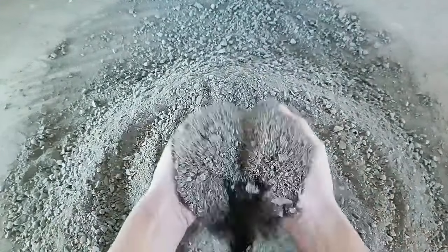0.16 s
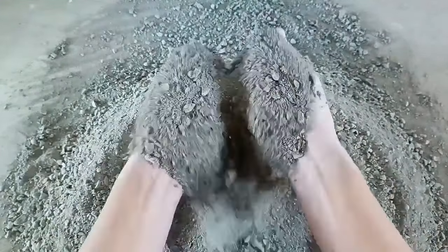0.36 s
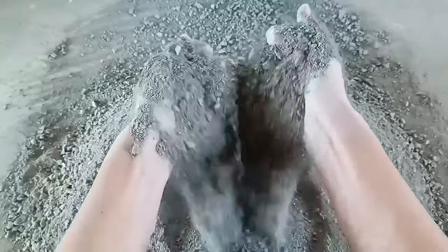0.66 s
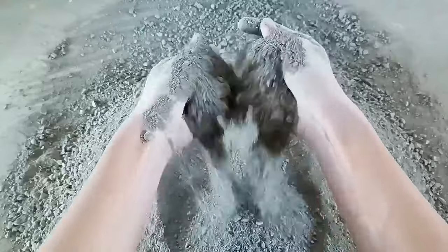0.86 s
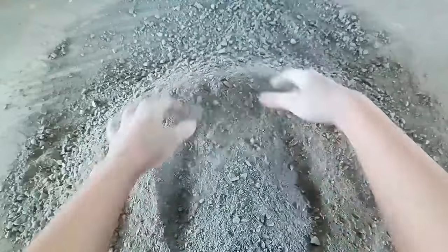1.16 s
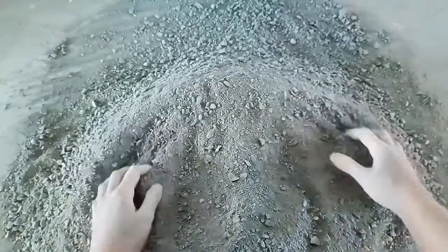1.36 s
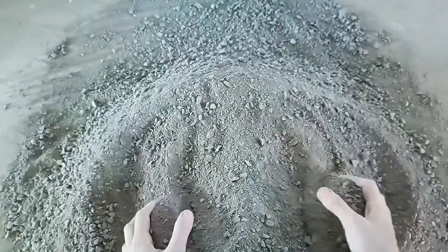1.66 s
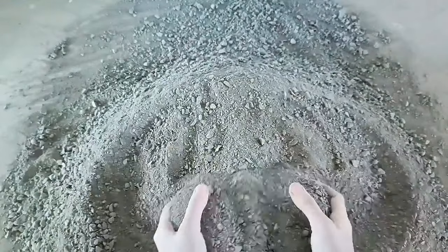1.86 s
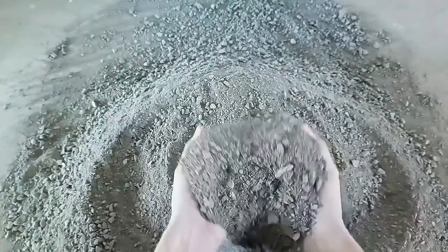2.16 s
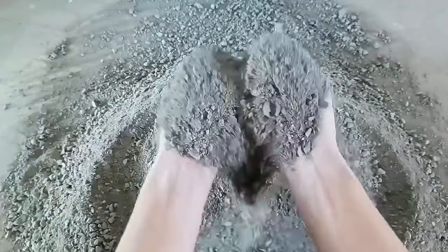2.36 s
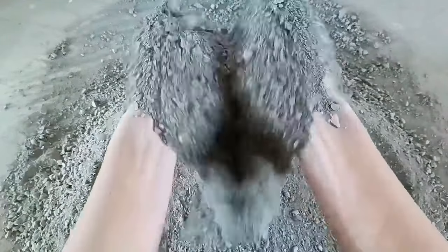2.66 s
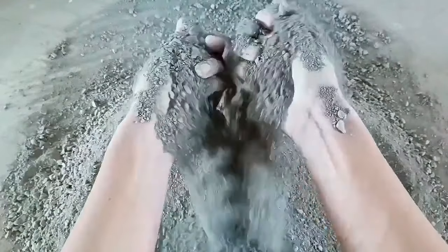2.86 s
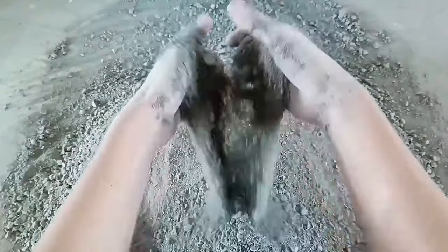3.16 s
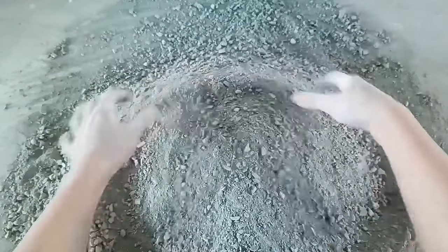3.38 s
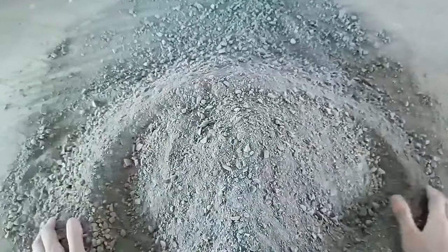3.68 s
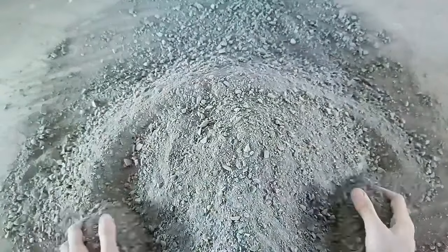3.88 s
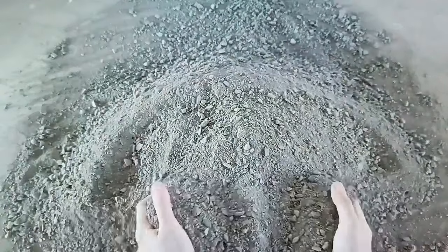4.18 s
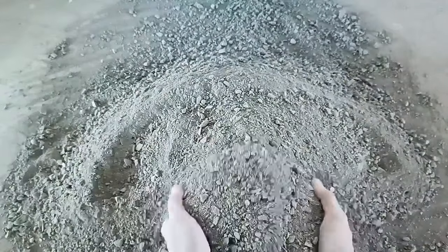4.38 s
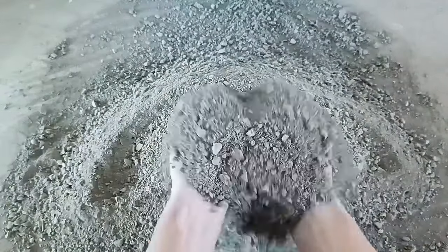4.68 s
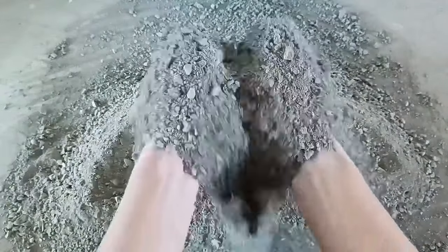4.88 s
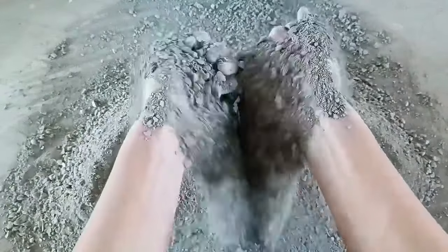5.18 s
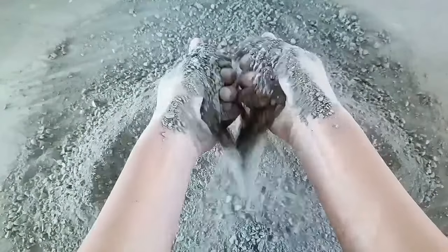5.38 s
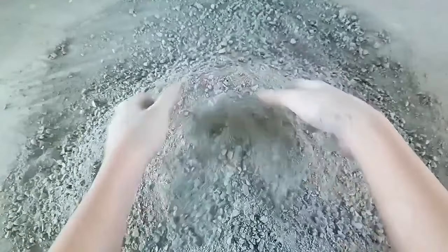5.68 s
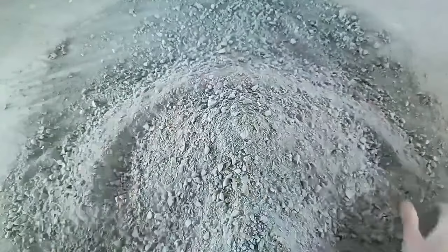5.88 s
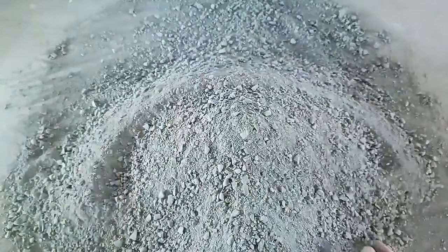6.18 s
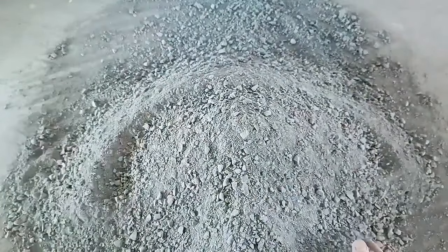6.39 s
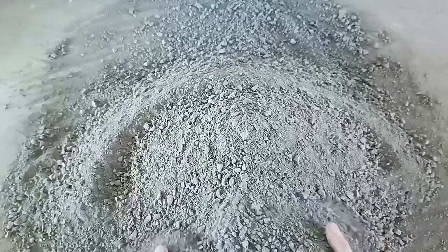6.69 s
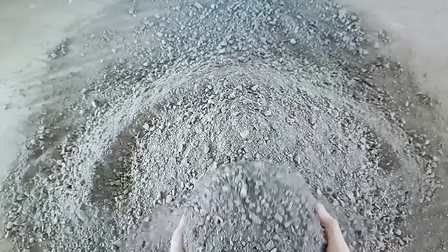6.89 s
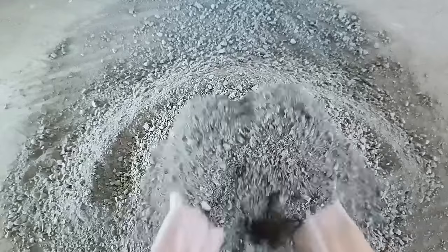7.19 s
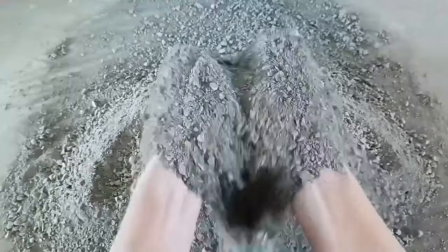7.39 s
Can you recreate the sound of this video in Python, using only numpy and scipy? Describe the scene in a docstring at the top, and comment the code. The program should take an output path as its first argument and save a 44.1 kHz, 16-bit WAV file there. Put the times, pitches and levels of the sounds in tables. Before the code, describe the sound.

Very close, two hands dig into a pile of dry crushed stone with a gritty crunch and low grinding, lift a heap, and let it leak, hiss and rush back down with sharp chip clicks and dull slumps. The cycle repeats about every two seconds, with quieter digging between pours. A low unsteady hum and soft rumble stay behind in a fairly dry room; the loudest peaks are slightly harsh.

```python
"""Hands grind through a pile of dry crushed concrete, lift a heap and let it pour back, over and over, close up.
Scoops, stabs, the pour, slumps and clumps are filtered random stone collisions under timed level curves.
Fine grit hisses as dense collisions; chips click as short decaying sines.
A wavering low sine and low filtered noise drone behind; the sharpest peaks clip."""
import sys
import numpy as np
from scipy import signal
from scipy.fft import rfft, irfft, next_fast_len
from scipy.io import wavfile

SR = 44100
rng = np.random.default_rng(int(sys.argv[2]) if len(sys.argv) > 2 else 0)


def generate_wav(signal):
    """Clip the signal to [-1, 1] and save it as 16-bit WAV at the path in sys.argv[1]."""
    frames = np.transpose(np.atleast_2d(signal))
    scaled = np.clip(frames, -1, 1) * 32767
    pcm = np.round(scaled).astype(np.int16)
    wavfile.write(sys.argv[1], SR, pcm)


N = 332514
TIME_S = np.arange(N) / SR

# hands ploughing through the pile; levels before layer trim:
# start_s, deepest_s, end_s, buried_stones_db, surface_stones_db, build_up_db_per_s
SCOOPS = [(0.0, 0.024, 0.19, -31, -34.5, 6), (1.338, 1.725, 2.46, -18.5, -21, 20),
          (3.678, 3.934, 4.8, -14.5, -18, 46), (6.004, 6.453, 7.3, -14.5, -18, 21)]
SCOOP_EDGE_S, BURIED_EASE_DB_PER_S, SURFACE_EASE_DB_PER_S = 0.1, 17, 29

# lifted handfuls leaking grit, then shed as the hands part; levels before layer trim:
# full_flow_s, hands_part_s, empty_s, flow_db, last_rush_db
HANDFULS = [(0.632, 1.143, 1.17, -16.5, -11.5), (2.72, 3.241, 3.335, -14, -9.5),
            (5.115, 5.583, 5.7, -12, -10), (7.58, 8.1, 8.4, -14.5, -10)]
LEAK_RISE_S, LEAK_RISE_DB, LEAK_HOLD_S, LEAK_SAG_DB_PER_S = 0.54, 19, 0.091, 9
RUSH_EDGE_S, TRICKLE_DB = 0.031, -40.5
SETTLE_REL_DB, SETTLE_FALL_DB_PER_S = -16, 70  # settling grit, relative to the last rush

# single chips knocking together: hit_s, peak_db, ring_hz
CHIPS = [(.2421, 2, 9000), (0.2576, -9, 9550), (.33, -13, 9500), (.379, 0, 9200), (.679, 5, 8720),
         (.697, 3, 9000), (.859, -1, 9240), (.922, -3, 1800), (1.038, 1, 9000), (1.086, 8.5, 8700),
         (1.149, 10, 9330), (1.204, 4, 8300), (1.985, -8.5, 736), (2.2318, -5.5, 8700), (2.3686, 0, 9450),
         (2.482, 6, 8600), (2.928, 12, 8850), (2.995, -3, 9800), (3.185, 3, 10200), (3.445, -22, 9000),
         (3.468, -18, 8500), (4.737, -1, 9110), (4.76, 0, 9050), (5.896, -5, 9500), (7.0754, -5, 9500),
         (7.136, 4, 10900), (7.154, 12, 9700), (7.1723, 5, 8800), (7.173, -3, 3950), (7.248, -5, 9700),
         (7.2853, 2, 8580), (7.327, 9, 10000), (7.395, 16, 11400), (7.483, 10, 10700)]

# gushes of gravel landing; levels before layer trim: thickest_s, level_db, swell_s, ebb_s
GUSHES = [(.49, -20, 0.16, 0.39), (.925, -18.5, 0.063, .11), (1.175, -19, 0.048, 0.027),
          (2.66, -14.5, .21, 0.19), (2.78, -27.5, .015, 0.086), (3.085, -15.5, 0.087, 0.089),
          (3.3, -24.5, 0.054, 0.058), (5.08, -16.5, 0.31, 0.26), (5.455, -18, 0.065, 0.044),
          (5.538, -19.5, .03, .015), (5.67, -25.5, 0.045, 0.065), (7.54, -15, 0.18, .2)]
# heavy masses slumping onto the pile: heaviest_s, level_db, swell_s, ebb_s
SLUMPS = [(1.19, -18.5, 0.025, 0.053), (1.97, -22.5, .04, 0.091), (2.29, -24.5, .05, 0.076),
          (5.275, -16, 0.03, .2), (5.73, -15.5, 0.034, 0.13)]
# clumps breaking off and shattering; levels before layer trim: thickest_s, level_db, swell_s, ebb_s
CLUMPS = [(1.02, -11, 0.023, 0.051), (1.175, -9, .03, 0.022), (2.715, -10.5, 0.033, 0.028)]
SWELL_DB, SWELL_SHAPE = 9.5, 1.41  # drop one swell or ebb time from the top; roundness of the top

# fingers stabbing into the pile; levels before layer trim: stab_s, grit_db, rasp_db
STABS = [(1.34, -32, -48), (3.685, -17, -23), (3.98, -35, -28), (6.01, -18.5, -19), (6.35, -49, -27.5),
         (6.73, -38, -28)]
STAB_RISE_DB_PER_S, STAB_FALL_DB_PER_S = 154, 127
SLIDE_REL_DB, SLIDE_FALL_DB_PER_S = -11, 28  # sliding slope, relative to the stab
RASP_SWELL_S, RASP_EBB_S = 0.041, 0.09

# spectrum of buried stones: freq_hz, relative_density_db
GRIND_COLOUR = [(90, -20.5), (160, -5.5), (240, 3), (340, -6.5), (430, -5.5), (540, 0.5), (700, 3.5),
                (950, -6.5), (1400, -12), (2500, -21.5)]
# spectrum of surface stones: freq_hz, relative_density_db
SURFACE_COLOUR = [(500, -4.5), (1000, 8), (1500, 9), (1750, 6), (2050, 7), (2350, 0), (2800, 2), (4500, -5),
                  (6500, -10), (10000, -12)]
# spectrum of room rumble: freq_hz, relative_density_db
ROOM_COLOUR = [(25, -30.5), (55, -32), (85, -12.5), (120, 4.5), (190, -0.5), (280, -9.5), (400, -11.5),
               (750, -14), (1200, -25.5), (4000, -28.5), (15000, -55)]
# spectrum of sand and crumbs: freq_hz, relative_density_db
GRIT_COLOUR = [(200, -3.5), (800, -4), (2500, -11), (4500, -5), (6200, -4.5), (7800, 0), (9300, 3.5),
               (10500, -0.5), (12500, -7.5), (15500, -13)]
# spectrum of pebbles: freq_hz, relative_density_db
PEBBLE_COLOUR = [(500, -18), (1500, 3), (3000, 1.5), (4500, 6.5), (6500, 4.5), (9300, 7), (12000, 1.5),
                 (15500, -11)]
# spectrum of splinter spray: freq_hz, relative_density_db
SPRAY_COLOUR = [(3000, -30), (7000, -15), (9400, 2), (11000, 0), (13000, -6), (15500, -8)]
# spectrum of landing gravel: freq_hz, relative_density_db
POUR_COLOUR = [(80, -20.5), (200, 0.5), (390, -4), (560, -1), (760, 2.5), (1100, -2.5), (1400, -2),
               (1780, 1), (2300, -2.5), (3200, -7.5), (5000, -14), (9000, -36)]
# spectrum of slumping masses: freq_hz, relative_density_db
SLUMP_COLOUR = [(60, -18), (120, 2), (180, -1), (270, 0), (380, -6), (510, 1.5), (650, -7.5), (880, -7.5),
                (1100, -17.5), (2500, -20.5)]
# spectrum of fingertip rasp: freq_hz, relative_density_db
RASP_COLOUR = [(300, -10), (900, -2.5), (1800, -1), (3000, 1), (4500, -3), (7000, -5), (13000, -19)]

HUM_HZ, HUM_RMS_DB, ROOM_RMS_DB = 141.8, -25.5, -26
CUTOFF_HZ = 15900


def from_db(db):
    """Decibels to gain."""
    return 10 ** (np.asarray(db) / 20)


def rms_one(x):
    """Scale to unit power."""
    return x / np.sqrt(np.mean(x ** 2) + 1e-20)


def drift(rate_hz):
    """Smooth random curve, spread 1, changing about rate_hz times a second."""
    step = 20  # samples between points
    pole = np.exp(-2 * np.pi * rate_hz * step / SR)
    noise = rng.standard_normal(N // step + 2002)
    slow = signal.lfilter([1], [1, -2 * pole, pole * pole], noise)[2000:]  # skip the filter start-up
    return np.interp(np.arange(N) / step, np.arange(len(slow)), rms_one(slow))


def colour(x, points):
    """Minimum-phase (causal) filter with the given spectrum; output rms 1."""
    size = 2 * next_fast_len(N // 2 + SR // 8)
    hz, db = np.transpose(points)
    bins_hz = np.maximum(np.arange(size // 2 + 1) * SR / size, 1)
    gain = from_db(np.interp(np.log(bins_hz), np.log(hz), db))
    low_cut = bins_hz / (bins_hz + hz[0] / 2)
    cepstrum = irfft(np.log(gain * low_cut))
    # folding the cepstrum makes the phase minimum
    cepstrum[1:size // 2] *= 2
    cepstrum[size // 2 + 1:] = 0
    response = np.exp(rfft(cepstrum))
    return rms_one(irfft(rfft(x, size) * response)[:N])


def grains(per_s, spread_db, low_hz, high_hz, sharpness_q, count=14):
    """Random collisions of unequal force, each briefly ringing one of count resonators; rms 1."""
    chance = per_s / SR
    force = from_db(spread_db * np.minimum(rng.exponential(1, N), 5.5))
    force = force * rng.choice([-1, 1], N)
    clicks = force * (rng.random(N) < chance) / np.sqrt(chance)
    stone = rng.integers(0, count, N)
    out = 0
    for k, hz in enumerate(np.geomspace(low_hz, high_hz, count)):
        b, a = signal.iirpeak(hz, sharpness_q, fs=SR)
        out = out + signal.lfilter(b, a, clicks * (stone == k) + 1e-18)
    return rms_one(out)


def before(s):
    """Seconds to go until s; zero afterwards."""
    return np.maximum(s - TIME_S, 0)


def after(s):
    """Seconds since s; zero beforehand."""
    return np.maximum(TIME_S - s, 0)


def gate(start_s, end_s, edge_s):
    """One from start to end, with linear ramps outside."""
    return np.clip(1 - (before(start_s) + after(end_s)) / edge_s, 0, 1)


def swells(rows):
    """Gain of moving masses: each swells to a rounded top and ebbs."""
    gain = 0
    for top_s, db, swell_s, ebb_s in rows:
        distance = np.minimum(before(top_s) / swell_s + after(top_s) / ebb_s, 10)
        gain = gain + from_db(db - SWELL_DB * distance ** SWELL_SHAPE)
    return gain


def scooping(grind_trim_db=0.73, surface_trim_db=-3.0, judder_db=1.0):
    """Buried stones grind harder with depth; surface stones crunch from the start; both ease on the lift."""
    deep, shallow = 0, 0
    for start_s, deepest_s, end_s, buried_db, surface_db, build_db_per_s in SCOOPS:
        moving = gate(start_s, end_s, SCOOP_EDGE_S)
        deep_db = grind_trim_db + buried_db - build_db_per_s * before(deepest_s)
        deep_db = deep_db - BURIED_EASE_DB_PER_S * after(deepest_s)
        shallow_db = surface_trim_db + surface_db - SURFACE_EASE_DB_PER_S * after(deepest_s)
        deep = deep + moving * from_db(deep_db)
        shallow = shallow + moving * from_db(shallow_db)
    buried = grains(per_s=4500, spread_db=-0.5, low_hz=140, high_hz=2520, sharpness_q=4.6)
    surface = grains(per_s=12000, spread_db=0.5, low_hz=675, high_hz=9000, sharpness_q=3.9)
    grind = deep * colour(buried, GRIND_COLOUR)
    crunch = shallow * colour(surface, SURFACE_COLOUR)
    return (grind + crunch) * from_db(judder_db * drift(24))


def hum(waver_db=5.5, phase_spread_rad=0.36):
    """Low sine wavering in level and phase, over filtered-noise room rumble."""
    phase_rad = 2 * np.pi * HUM_HZ * TIME_S + phase_spread_rad * drift(6.6)
    waver = from_db(waver_db * np.tanh(drift(11.3)))
    drone = rms_one(np.sin(phase_rad) * waver)
    rumble = colour(rng.standard_normal(N), ROOM_COLOUR)
    return from_db(HUM_RMS_DB) * drone + from_db(ROOM_RMS_DB) * rumble


def grit_flow():
    """Grit level in dB: power sum of trickle, leaks, last rushes, settling, stabs and slides."""
    flows = [from_db(TRICKLE_DB) * np.ones(N)]
    for full_s, part_s, empty_s, flow_db, rush_db in HANDFULS:
        leak_db = flow_db - LEAK_RISE_DB * (before(full_s) / LEAK_RISE_S) ** 2
        leak_db = leak_db - LEAK_SAG_DB_PER_S * after(full_s + LEAK_HOLD_S)
        settle_db = rush_db + SETTLE_REL_DB - SETTLE_FALL_DB_PER_S * after(empty_s)
        flows.append(from_db(leak_db) * gate(0, empty_s, RUSH_EDGE_S))
        flows.append(from_db(rush_db) * gate(part_s, empty_s, RUSH_EDGE_S))
        flows.append(from_db(settle_db) * (TIME_S > empty_s))
    for stab_s, grit_db, _ in STABS:
        rise_db = grit_db - STAB_RISE_DB_PER_S * before(stab_s)
        flows.append(from_db(rise_db - STAB_FALL_DB_PER_S * after(stab_s)))
        flows.append(from_db(rise_db + SLIDE_REL_DB - SLIDE_FALL_DB_PER_S * after(stab_s)))
    return 10 * np.log10(sum(flow ** 2 for flow in flows))


def grit(sand_db=-2, crumb_db=-4.0, pebble_db=-5, spray_db=-7, uneven_db=1.82,
         pebble_growth=1.12, spray_growth=2.3):
    """Sand hisses and crumbs tick; strong flow adds clattering pebbles and a bright splinter spray."""
    level_db = grit_flow()
    top_db = level_db.max()
    below_top_db = level_db - top_db
    sand = grains(per_s=25000, spread_db=3.5, low_hz=488, high_hz=16300, sharpness_q=5.2)
    crumbs = grains(per_s=1500, spread_db=1.5, low_hz=3300, high_hz=13000, sharpness_q=1.65)
    pebbles = grains(per_s=350, spread_db=4.0, low_hz=2680, high_hz=13300, sharpness_q=1.15)
    spray = grains(per_s=900, spread_db=3.0, low_hz=7000, high_hz=15000, sharpness_q=1.2, count=5)
    fine = from_db(sand_db) * colour(sand, GRIT_COLOUR) + from_db(crumb_db) * colour(crumbs, GRIT_COLOUR)
    fine = fine * from_db(level_db + uneven_db * drift(46))
    # growth above 1: level falls faster than the flow
    pebble_gain = from_db(pebble_db + top_db + pebble_growth * below_top_db)
    spray_gain = from_db(spray_db + top_db + spray_growth * below_top_db)
    return fine + pebble_gain * colour(pebbles, PEBBLE_COLOUR) + spray_gain * colour(spray, SPRAY_COLOUR)


def ring(clicks, hz, cycles):
    """A unit click rings as a sine of height 1, falling 60 dB in the given cycles."""
    radius = from_db(-60 * hz / (cycles * SR))
    w = 2 * np.pi * hz / SR
    return signal.lfilter([0, np.sin(w)], [1, -2 * radius * np.cos(w), radius * radius], clicks + 1e-18)


def knock(hz, cycles, scatter_s, loose, size=4096):
    """A contact and a quick decaying scatter of others ring a stone; peak 1."""
    contact = loose * rng.standard_normal(size) * np.exp(-np.arange(size) / (scatter_s * SR))
    contact[0] = 1
    sound = ring(contact, hz, cycles)
    return sound / np.abs(sound).max()


def add(out, s, sound):
    """Mix a short sound in at s seconds."""
    part = out[max(round(s * SR), 0):][:len(sound)]
    part += sound[:len(part)]


def stones():
    """Chips click together; the bigger the stone, the lower its knock."""
    out = np.zeros(N)
    for hit_s, peak_db, ring_hz in CHIPS:
        add(out, hit_s, from_db(peak_db) * knock(ring_hz, cycles=16, scatter_s=0.00083, loose=0.53))
    return out


def pouring(pour_trim_db=3.5, lumpy_db=1.87):
    """The stream lands in uneven lumps of dull little impacts; whole masses slump with a rumble."""
    flow = swells(GUSHES) * from_db(pour_trim_db + lumpy_db * drift(31))
    impacts = grains(per_s=9000, spread_db=1.0, low_hz=154, high_hz=7950, sharpness_q=1.74)
    thuds = grains(per_s=1900, spread_db=-5.0, low_hz=104, high_hz=1450, sharpness_q=1.5)
    return flow * colour(impacts, POUR_COLOUR) + swells(SLUMPS) * colour(thuds, SLUMP_COLOUR)


def shattering(shatter_trim_db=-2):
    """A falling clump bursts into a quick clatter of pebbles."""
    burst = swells(CLUMPS) * from_db(shatter_trim_db)
    pebbles = grains(per_s=1500, spread_db=2.5, low_hz=2200, high_hz=9000, sharpness_q=2.2)
    return burst * colour(pebbles, PEBBLE_COLOUR)


def stabbing(rasp_trim_db=0.5):
    """Fingertips entering the pile scrape small stones together in a short, bright rasp."""
    push = swells([(s, rasp_db + rasp_trim_db, RASP_SWELL_S, RASP_EBB_S) for s, _, rasp_db in STABS])
    scrape = grains(per_s=9000, spread_db=2.0, low_hz=600, high_hz=11000, sharpness_q=1.2)
    return push * colour(scrape, RASP_COLOUR)


def room(x, wet_db=-21, t60_s=0.25):
    """Faint diffuse reflections: a decaying noise tail."""
    t = TIME_S[:SR // 2]
    tail = rng.standard_normal(len(t)) * from_db(-60 * t / t60_s)
    tail = tail * (t > 0.003)  # gap before the first reflection
    return x + from_db(wet_db) * signal.fftconvolve(x, tail / np.linalg.norm(tail))[:N]


def scene():
    """Gravel close up with its reflections, the hum behind it."""
    gravel = scooping() + grit() + stones() + pouring() + shattering() + stabbing()
    return (room(gravel) + hum())[None]


def record(dry, top=0.91):
    """The loudest peaks clip; a steep low-pass cuts the top of the treble."""
    clipped = np.clip(dry, -top, top)
    low_pass = signal.ellip(12, 0.1, 70, CUTOFF_HZ, fs=SR, output="sos")
    return signal.sosfilt(low_pass, clipped)


dry = scene()
out = record(dry)
generate_wav(out)
```